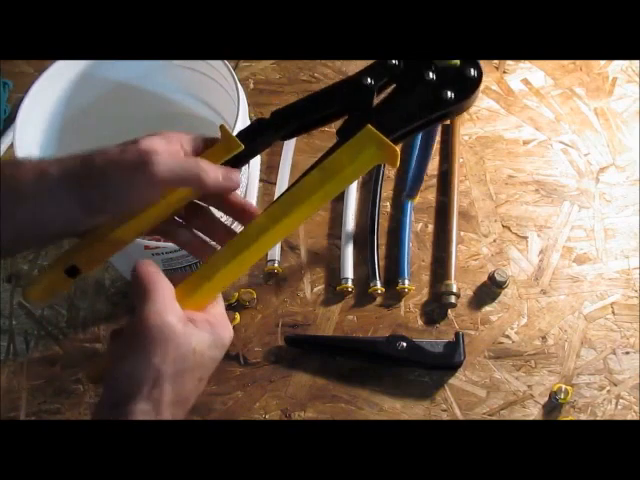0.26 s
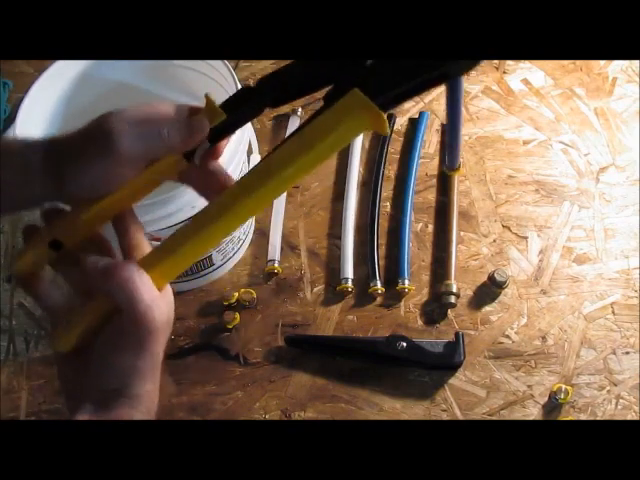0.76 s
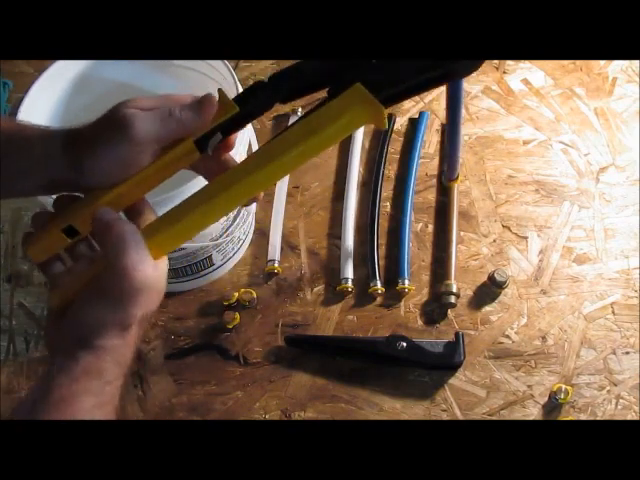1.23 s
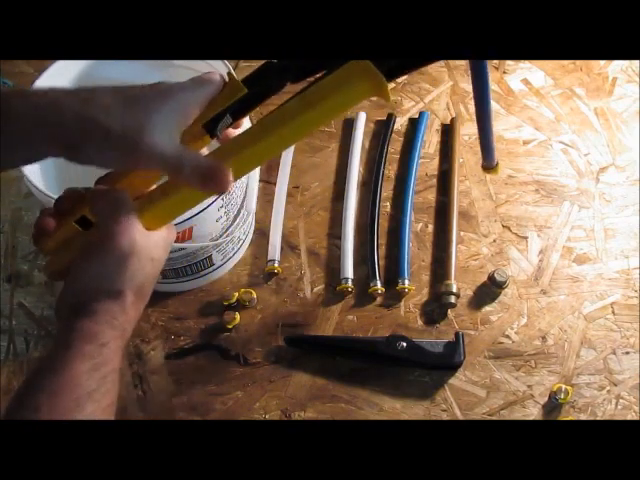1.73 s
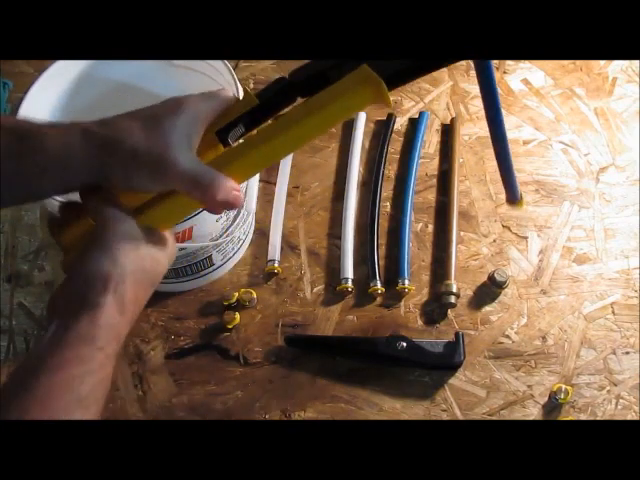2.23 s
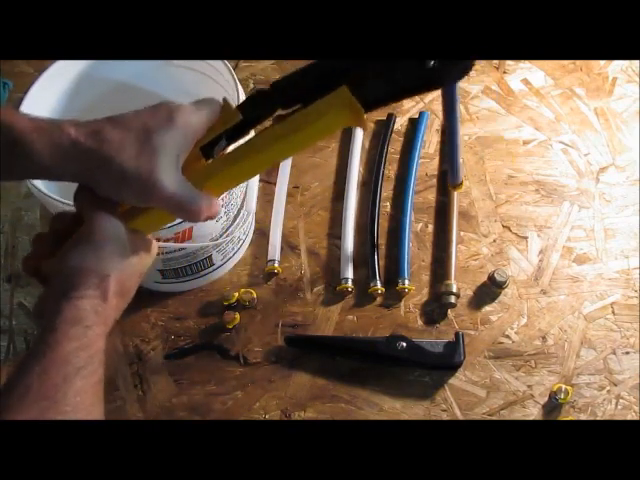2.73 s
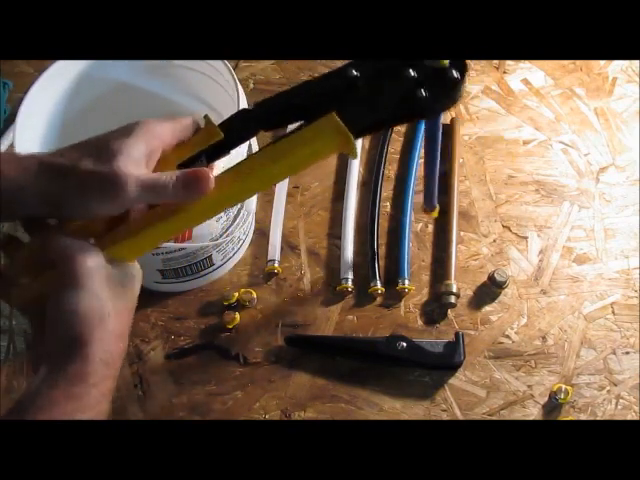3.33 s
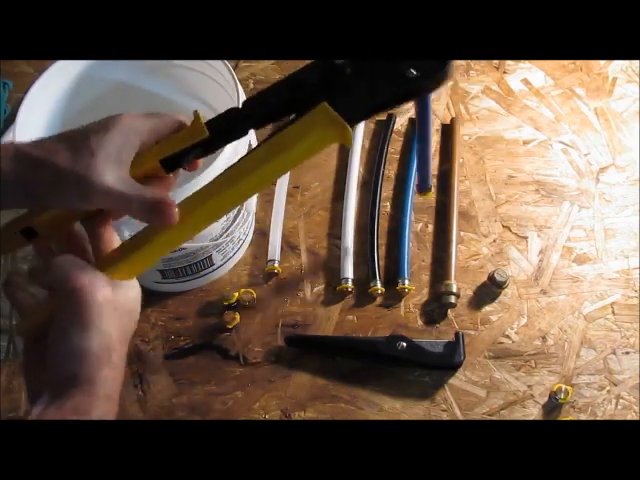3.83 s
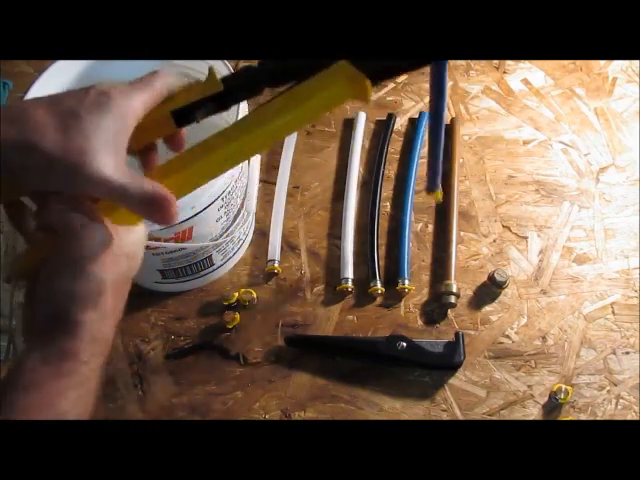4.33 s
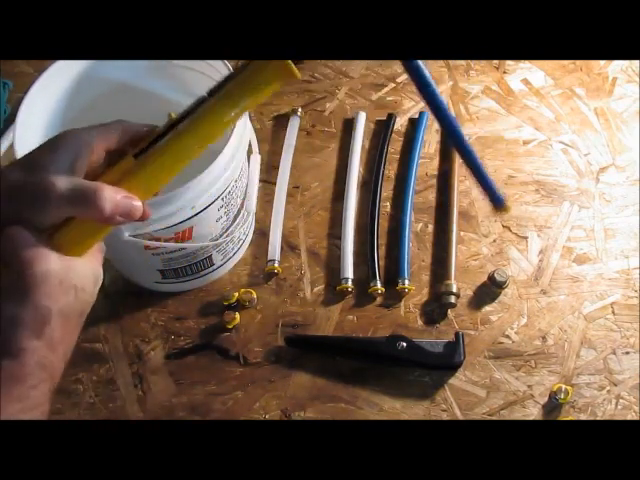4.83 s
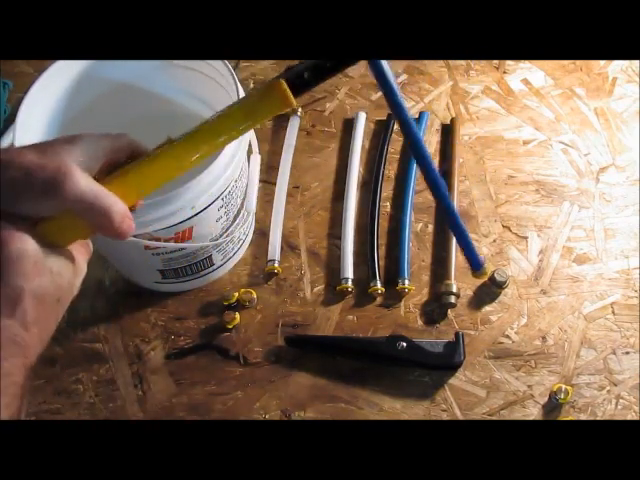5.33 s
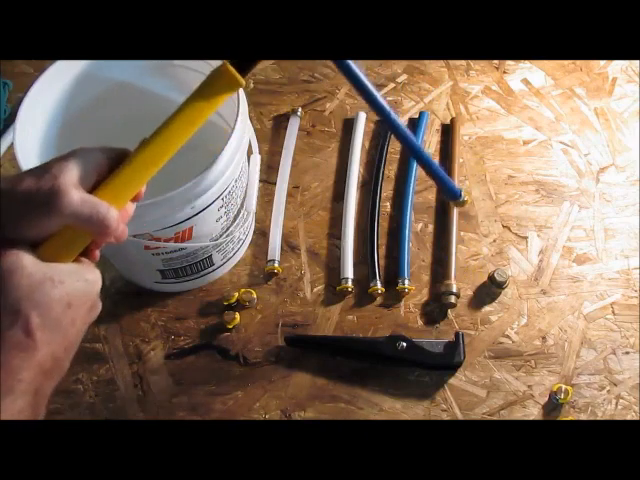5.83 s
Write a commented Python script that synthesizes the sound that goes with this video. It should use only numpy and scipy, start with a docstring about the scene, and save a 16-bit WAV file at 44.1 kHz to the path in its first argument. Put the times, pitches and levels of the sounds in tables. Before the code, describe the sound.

Close in a small workshop, a hand press tool starts at once with a rapid rattle of sharp steel clicks at 0.01-0.03 s, then brighter clacks with a hollow knock at 0.16 and clicks at 0.27. A strong snap comes at 0.66, a softer click at 1.05, and a very bright snap at 1.36 leaving a faint high ring. Quiet grip rubs follow, with small ticks and a short ping around 2.2. The hardest, brightest snap hits at 2.55, ringing thinly. Soft rubbing leads through a click at 3.57 to a dense, creaking clatter at 3.71-3.74, then blunt hollow knocks at 3.84 and 4.39. Tiny ticks and rubs continue until crisp snaps at 5.57 and 5.71, with a faint ring fading afterward. A low stereo hush, slightly louder at first, dips after the 1.36, 2.55, 3.72 and 5.66 s marks and slowly returns.

```python
"""A burst of sharp steel clicks, then snaps and ticks: a hand press tool is worked over a wooden bench, close
by. Each contact of its links and ratchet excites a bank of decaying modes, and the loudest snaps return off the
bench about 2 ms later; a long steel mode also rings on its own. Loose handles knock as hollow notes; hands rub
the plastic grips as swelling noise, with creaking joints. A small workshop answers each contact with decaying
noise. A steady hush lies beneath; it starts louder, settles, and four times dips and slowly returns."""
import sys
import numpy as np
from scipy import signal
from scipy.fft import rfft, irfft, next_fast_len
from scipy.io import wavfile
from scipy.ndimage import uniform_filter1d, map_coordinates

SR = 44100
rng = np.random.default_rng(int(sys.argv[2]) if len(sys.argv) > 2 else 0)


def unload_audio(sound):
    """Save the sound as a 16-bit wav file, at the path given as the first command line argument."""
    columns = np.transpose(np.atleast_2d(sound))
    # keep every value between -1 and 1, then stretch to whole-number steps
    steps = np.round(np.clip(columns, -1, 1) * 32767)
    wavfile.write(sys.argv[1], SR, steps.astype(np.int16))


N = 267642


def amp(db):
    """dB to gain."""
    return 10 ** (np.asarray(db) / 20)


def unit(x):
    """x scaled to rms 1 over all channels."""
    return x / np.sqrt(np.mean(x ** 2) + 1e-20)


def along(points, hz):
    """Interpolates (Hz, value) points on a log frequency axis."""
    point_hz, value = np.transpose(points)
    return np.interp(np.log(hz + 1), np.log(point_hz + 1), value)


def filtered(x, response):
    """Multiplies the spectrum of x by response(hz)."""
    m = next_fast_len(N + SR // 2)
    return irfft(rfft(x, m) * response(np.fft.rfftfreq(m, 1 / SR)), m)[..., :N]


def rush(spectrum, alike):
    """Stereo noise of rms 1; the mid-side balance sets the left-right correlation per frequency."""
    def mid_side_gain(hz):
        turn = np.arccos(np.clip(along(alike, hz), -1, 1)) / 2
        return amp(along(spectrum, hz)) * [np.cos(turn), np.sin(turn)]

    mid, side = filtered(rng.standard_normal((2, N)), mid_side_gain)
    return unit(np.array([mid + side, mid - side]))


# Contacts of links and ratchet, also answered by the shop; the rows at 0.6595, 2.5483, 3.7298, 5.5753 and 5.711
# s, # about 2 ms after a loud snap, are that snap returning off the bench. Each row: start in seconds,
# excitation in dB, # hump centre in octaves over 1 kHz, hump narrowness in dB per octave squared, handle knock
# in dB re the hump.
CLICKS = [(0.0095, -29.0, 2.4, 7.0, -20.0), (0.0142, -14.0, 2.4, 13.0, -35.0), (0.0164, -9.5, 2.2, 7, -38),
          (0.0187, -16.5, 2.3, 7.0, -37.0), (0.0216, -15.5, 2.0, 7.0, -34.0),
          (0.025, -26.0, 1.9, 6.0, -29.0), (0.1633, -13.5, 3.6, 2, -26), (0.1652, -17.5, 1.35, 9, -22),
          (0.1714, -23.0, 1.7, 3.0, -22.0), (0.2664, -16.0, 2.3, 8.0, -43.0),
          (0.2693, -22.0, 1.7, 8.0, -32.0), (0.3318, -43.5, 3.1, 18.0, -11.0),
          (0.3407, -53.5, 3.3, 13.0, 3.0), (0.5408, -31.5, 2.6, 9.0, -21.0),
          (0.632, -32.5, 1.9, 10.0, -13.0), (0.6571, -11, 2.3, 14, -22), (0.6595, -20, 2.3, 14, -22),
          (0.7796, -42, 1.7, 12, -26), (1.0509, -22.0, 2.4, 14.0, -22.0), (1.2966, -34.5, 2.1, 9.0, -11.0),
          (1.3554, -27, 1.4, 4, -3), (1.3569, -8, 3.7, 5, -25), (1.5755, -54.5, 3.7, 1.0, -23.0),
          (1.9029, -46.5, 2.9, 10.0, -9.0), (2.163, -51.5, 3.0, 4.0, -15.0),
          (2.1711, -48.0, 3.1, 9.0, -16.0), (2.1814, -50.0, 4.1, 1.0, -21.0),
          (2.1961, -45.0, 2.2, 7.0, -10.0), (2.2071, -40.5, 1.2, 4.0, -11.0),
          (2.2158, -52.5, 1.4, 2.0, 11.0), (2.2241, -47.5, 1.3, 2.0, 3.0), (2.5462, -4, 4, 8, -29),
          (2.5483, -26, 1.5, 1.5, -12), (2.622, -52, 2.6, 6, -22), (2.8114, -56.0, 2.0, 3.0, -23.0),
          (3.0994, -49.0, 1.8, 13.0, -25.0), (3.159, -47.0, 3.6, 1.0, -13.0),
          (3.2944, -44.5, 4.1, 1.0, -23.0), (3.5166, -55.0, 1.2, 2.0, 4.0),
          (3.5668, -23.5, 1.6, 5.0, -31.0), (3.7107, -13, 1.9, 7, -10), (3.713, -18, 1.9, 9, 1),
          (3.7195, -12.0, 2.6, 11.0, -17.0), (3.723, -19.5, 2.9, 5.0, -13.0), (3.7278, -8, 3.4, 4, -21),
          (3.7298, -14, 2.9, 12, -12), (3.7352, -27, 2.8, 6, -4), (3.8364, -58, 2.2, 8, 10),
          (4.2695, -58.0, 3.3, 3.0, -11.0), (4.2777, -55.5, 1.3, 3.0, 2.0), (4.3895, -43.0, 1.9, 17.0, 5.0),
          (4.8124, -49.5, 2.8, 22.0, -19.0), (4.8485, -52.0, 3.3, 22.0, -23.0),
          (5.0763, -55.5, 3.9, 1.0, -13.0), (5.1678, -48.0, 1.9, 16.0, -13.0),
          (5.2153, -58.0, 1.2, 2.0, 1.0), (5.3501, -51, 3.7, 2, -11), (5.3674, -39, 1.5, 2, -8),
          (5.3734, -42.0, 2.0, 1.0, -19.0), (5.474, -49.0, 2.4, 1.0, -19.0),
          (5.4847, -40.5, 3.6, 1.0, -10.0), (5.5059, -40.5, 3.8, 2.0, -7.0),
          (5.5719, -24.5, 1.8, 2.0, -21.0), (5.5732, -15.5, 4.2, 1.0, -13.0), (5.5753, -14.5, 3.5, 5, -29),
          (5.7089, -10.5, 3.7, 3, -25), (5.711, -17, 3.6, 3, -20), (5.7189, -39.0, 3.0, 6.0, -19.0),
          (6.0431, -55.0, 1.9, 10.0, -11.0)]
# Modes of the held tool. Each row: frequency in Hz, level in dB, t60 in seconds at looseness 1.
TOOL = [(386, -16.5, 0.01), (983, -1.5, 0.012), (1185, 1.5, 0.016), (1384, -4, 0.0077), (1940, -2.5, 0.006),
        (2424, -1.5, 0.018), (2896, -0.5, .012), (3278, -3, .011), (3990, -3.5, .008), (4460, -7.5, 0.0082),
        (4490, -5.5, 0.0097), (5200, -4, 0.013), (5750, 0.5, .006), (6370, 1, 0.0069), (6850, -1, 0.008),
        (7700, 0.5, .006), (7800, 0, 0.0052), (8464, 2.5, 0.0074), (9130, 2, 0.007), (9810, 1, 0.0064),
        (10460, 4.5, 0.0054), (11464, 2.5, 0.0082), (12480, 0.5, .004), (13370, 1, 0.0051),
        (15660, -2.5, 0.0037), (15900, -4.5, .003)]
# Position of the tool. Each row: time in seconds, left-right difference in dB before scatter.
PLACE = [(0, 1.8), (3.4, 1.2), (3.72, 1.6), (4.8, 2.5), (5.2, 9), (5.52, 11), (5.56, 2), (6.07, 2)]
PLACE_SCATTER_DB = 1.2
LOOSE, LOOSE_PER_DB = 1.3, .022  # t60 factor base at a 0 dB knock, its growth per dB of knock


def clicks(size=2048):
    """Each contact rings every tool mode at a new strength, phase and slightly shifted pitch."""
    out = np.zeros((2, N + size))
    t = np.arange(size) / SR
    hz, level_db, t60 = np.transpose(TOOL)[:, :, None]
    mode_chance = rng.standard_normal((len(CLICKS), 4, len(TOOL), 1))
    place_chance = rng.standard_normal(len(CLICKS))
    onset = 1 - np.exp(-(t / 0.0002) ** 2)
    for (s, *touch), (size_z, pitch_z, phase_z, angle_z), place_z in zip(CLICKS, mode_chance, place_chance):
        # harder handle knock: longer low modes
        looseness = max(LOOSE + LOOSE_PER_DB * touch[-1], .3)
        fade_db = -60 * t / (t60 * looseness ** np.minimum(3500 / hz, 2))
        strength = amp(level_db + colour(hz, *touch) + 2.8 * size_z + fade_db)
        phase = 2 * np.pi * hz * (1 + .015 * pitch_z) * t + 10 * phase_z
        modes = strength * np.exp(1j * phase)
        # left side a little nearer; each mode radiates differently to the two sides
        lead_rad = np.minimum(hz / 3500, 1) * (0.52 + 0.24 * angle_z)
        pair = (np.exp(1j * lead_rad.T * [[1], [-1]]) @ modes).imag
        pan_db = np.interp(s, *np.transpose(PLACE)) + PLACE_SCATTER_DB * place_z
        pan = amp(np.array([[pan_db], [-pan_db]]) / 2)
        out[:, round(s * SR):][:, :size] += pan * onset * pair
    return out[:, :N]


HANDLE_HZ, HANDLE_SLOPE_DB = 1250, 17  # knock falls above this, dB per octave
HANDLE_LOW_HZ, HANDLE_LOW_SLOPE_DB = 900, 5  # knock thins out below this, dB per octave


def colour(hz, db, centre, focus_db, knock_db):
    """Excitation in dB per frequency: a hump for the steel plus the low knock of the handles, as powers."""
    steel_db = -focus_db * (np.log2((hz + 1) / 1000) - centre) ** 2
    above_oct = np.maximum(np.log2((hz + 1) / HANDLE_HZ), 0)
    below_oct = np.maximum(np.log2(HANDLE_LOW_HZ / (hz + 1)), 0)
    handle_db = knock_db - HANDLE_SLOPE_DB * above_oct - HANDLE_LOW_SLOPE_DB * below_oct
    return db + 10 * np.log10(amp(2 * steel_db) + amp(2 * handle_db))


# Long ring of one steel part. Each row: start in seconds, pitch in Hz, level of the slow decay in dB,
# t60 of the slow decay in seconds, time in seconds when damping starts.
RINGS = [(1.357, 1237, -59, 2.7, 2.2), (2.212, 1243, -42.5, 0.15, 2.222), (2.549, 1235, -57, 2.02, 3.15),
         (5.578, 1242, -48.5, 0.95, 5.615), (5.749, 1252, -71.5, 7.4, 6.66)]


def ring():
    """One lightly damped steel mode sings on until a grip or the next catch damps it."""
    t = np.arange(N) / SR
    out = np.zeros(N)
    for s, hz, db, t60, stop in RINGS:
        age = np.maximum(t - s, 0)
        first_swing = amp(3.5 - 60 * age / .35)  # added fast decay
        onset = 1 - np.exp(-age / 0.0022)
        damping = amp(-60 * np.maximum(t - stop, 0) / 0.09)
        fade = (amp(-60 * age / t60) + first_swing) * onset * damping
        out += amp(db) * fade * np.sin(2 * np.pi * hz * age)
    return out * amp([[1], [-1]])  # left-right dB


# Free handle knocks. Each row: start in seconds, pitch in Hz, level in dB.
HOLLOW = [(.165, 370, -37), (.172, 1055, -33), (.821, 300, -53), (3.836, 1195, -39), (4.391, 1380, -47)]
HOLLOW_T60_S, HOLLOW_RISE_S = .035, .0015  # note
AFTER_DB, AFTER_T60_S = -13, .2  # its rough after-sound


def hollow(size=8192):
    """A loosely held handle sounds one blunt decaying note; slow noise modulates its lingering after-sound."""
    out = np.zeros(N + size)
    t = np.arange(size) / SR
    onset = 1 - np.exp(-t / HOLLOW_RISE_S)
    for (s, hz, db), z in zip(HOLLOW, rng.standard_normal((len(HOLLOW), 2, size))):
        slow_noise = uniform_filter1d(uniform_filter1d(z, size=150), size=150)
        a, b = unit(slow_noise)
        turn = 2 * np.pi * hz * t
        note = amp(-60 * t / HOLLOW_T60_S) * np.sin(turn)
        after = amp(AFTER_DB - 60 * t / AFTER_T60_S) * (a * np.sin(turn) + b * np.cos(turn))
        out[round(s * SR):][:size] += amp(db) * onset * (note + after)
    return out[:N] * amp([[1], [-1]])


# Rubs of hand and parts. Each row: peak time in seconds, nominal length in seconds, skin level in dB,
# creak of the joints in dB re the skin.
RUBS = [(.78, .06, -58.5, -4.5), (1.6, .09, -62, -31), (1.77, .21, -60.5, -7.5), (1.97, .065, -67.5, 1.5),
        (2.175, .056, -59, -19), (2.219, .054, -49.5, -.6), (2.38, .3, -65, -19.5), (3.09, .064, -65.5, .6),
        (3.163, .054, -57, -7), (3.34, .067, -53.5, -15.5), (3.556, .15, -64.5, -3.5),
        (3.66, .25, -58.5, 6), (3.77, .11, -69, 12), (3.88, .14, -81, 11), (4.149, .155, -82, 6),
        (4.35, .118, -59, -7), (4.42, .07, -74, 10), (4.646, .08, -64, -4.5), (4.813, .05, -63, -22),
        (5.011, .087, -59, -2.5), (5.23, .085, -70, -9), (5.378, .039, -55, .1), (5.488, .046, -56.5, -17),
        (6.0, .056, -73, -9.5)]
# Skin friction spectrum. Each row: frequency in Hz, relative density in dB per Hz.
SKIN = [(700, -32), (2000, 0), (3000, -5), (5000, 1), (8000, 0), (12000, -1), (16000, -19)]
RISE_SHARE = .45  # of the length


def rubs():
    """Friction noise swells and fades with an uneven grain; the joints creak along with it."""
    t = np.arange(N) / SR
    skin, body = np.zeros(N), np.zeros(N)
    for s, length_s, db, body_db in RUBS:
        share = np.where(t < s, RISE_SHARE, 1 - RISE_SHARE)
        stroke = amp(db) * np.exp(-2 * ((t - s) / (length_s * share)) ** 2)
        skin += stroke
        body += amp(body_db) * stroke
    grain_db = map_coordinates(rng.standard_normal(N // 100 + 4), [np.arange(N) / 100])
    grain = unit(amp(grain_db))
    friction = skin * rush(SKIN, [(1000, 0.84)]) + body * creak()
    return grain * friction * amp([[1], [-1]])


# Handle resonances under friction. Each row: frequency in Hz, width in Hz, level in dB.
BODY = [(980, 190, -1), (1180, 90, 1.5), (1500, 900, -15.5), (2480, 1000, -10), (3170, 300, -7.5)]


def creak(rate_hz=900):
    """Random stick-slip jerks of uneven size, plus weak noise, excite the handle resonances."""
    jerks = (rng.random(N) < rate_hz / SR) * amp(2.8 * rng.standard_normal(N))
    drive = jerks + 0.13 * rng.standard_normal((2, N))

    def handles(hz):
        total = 0
        for k, (centre, width, db) in enumerate(BODY):
            resonance = 1j * hz * width / (centre * centre - hz * hz + 1j * hz * width)
            total = total + (-1) ** k * amp(db) * resonance  # alternating sign
        return total * hz / (hz + 600)

    return unit(filtered(drive, handles))


# Room decay. Each row: frequency in Hz, t60 in seconds.
SHOP = [(300, .2), (1200, 0.15), (3500, 0.33), (8000, 0.26), (12000, .26), (16000, .2)]
# Room colour. Each row: frequency in Hz, gain in dB.
WALLS = [(200, -24), (400, -14), (1100, 0), (2100, 1.5), (3300, -2.5), (5200, -6), (7400, -9.5),
         (10000, -8.5), (13000, -10), (16000, -16)]
ROOM_DB, WALL_DELAY_S = -11, .001
BROAD, MODAL, SHARPNESS = .4, .95, 1.5  # broad share, tool-mode share, mode peak sharpness
SMOOTH_HZ, SMOOTH = 5200, 1.15  # above this the modes merge to one gain
EVEN = .7  # narrowness factor: the walls hear a wider hump


def shop(size=13312):
    """The room answers each contact in its colour with fresh noise, each frequency dying at its own speed."""
    out = np.zeros((2, N + SR))
    fine_hz = np.fft.rfftfreq(size, 1 / SR)
    hz, t, z = signal.stft(rng.standard_normal((len(CLICKS), 2, size)), SR, nperseg=256)
    decay = amp(-60 * t / along(SHOP, hz)[:, None])
    tails = signal.istft(z * decay, SR, nperseg=256)[1][..., :size]
    peaks = sum(amp(db) / (1 + ((fine_hz - mode_hz) * t60 * SHARPNESS) ** 2) for mode_hz, db, t60 in TOOL)
    low = 1 / (1 + (fine_hz / SMOOTH_HZ) ** 6)
    tool_gain = low * (BROAD + MODAL * peaks) + (1 - low) * SMOOTH
    walls = tool_gain * amp(along(WALLS, fine_hz))
    for (s, db, centre, focus_db, knock_db), tail in zip(CLICKS, tails):
        contact = amp(colour(fine_hz, db, centre, EVEN * focus_db, knock_db))
        answer = irfft(rfft(tail) * contact * walls, size)[:, :size * 7 // 8]
        out[:, round((s + WALL_DELAY_S) * SR):][:, :answer.shape[1]] += answer
    return amp(ROOM_DB) * amp([[.8], [-.8]]) * out[:, :N]


# Hush spectrum. Each row: frequency in Hz, relative density in dB per Hz.
AIR = [(15, -42.5), (25, -9), (231, -6), (265, -4.5), (974, -6.5), (1210, -8), (2880, -11), (8310, -14.5),
       (15100, -19.5), (16400, -39)]
# Hush width. Each row: frequency in Hz, left-right correlation.
ALIKE = [(60, 0.18), (1400, .3), (3100, 0.074), (7000, .03)]
# Dips of the hush. Each row: start in seconds, nominal depth in dB, return time constant in seconds.
DIPS = [(1.356, 9, .6), (2.546, 6.5, .6), (3.72, 16.5, .8), (5.66, 9, 1.1)]
DIP_S = .03  # sinking time constant
HUSH_DB, OPENING_DB, OPENING_S = -59.5, 3, .25  # resting level, extra at the start, settling time constant


def hush():
    """Steady noise of room and microphone; at the listed times it sinks fast and creeps back."""
    t = np.arange(N) / SR
    level_db = HUSH_DB + OPENING_DB * np.exp(-(t / OPENING_S) ** 2)
    for s, depth_db, return_s in DIPS:
        age = np.maximum(t - s, 0)
        level_db -= depth_db * (1 - np.exp(-age / DIP_S)) * np.exp(-(age / return_s) ** 2)
    return amp(level_db) * rush(AIR, ALIKE) * amp([[.9], [-.9]])


def scene():
    """Tool and hands in the room."""
    return clicks() + ring() + hollow() + rubs() + shop() + hush()


TOP_HZ = 16500


def record(dry):
    """The input rounds off at full scale, then lifts the band slightly, rolls off the top and cuts at TOP_HZ."""
    rounded = dry / (1 + np.abs(dry) ** 6) ** (1 / 6)
    roll_off = [(14500, 1.5), (15700, -7.5), (16300, -14.5)]  # Hz, dB
    return filtered(rounded, lambda hz: amp(along(roll_off, hz)) * (hz < TOP_HZ))


dry = scene()
out = record(dry)
unload_audio(out)
```